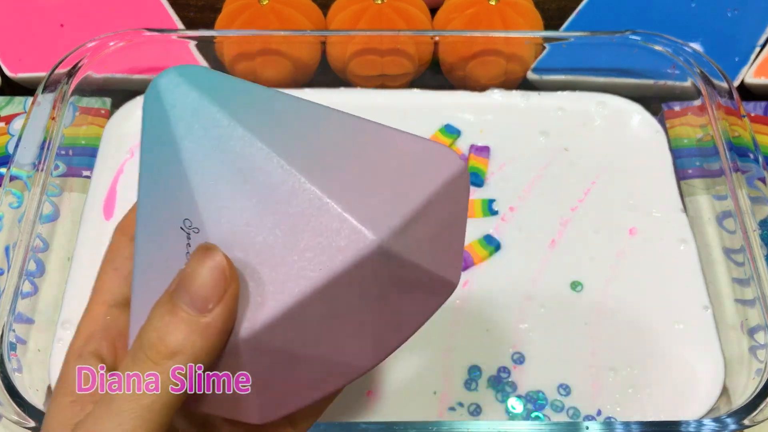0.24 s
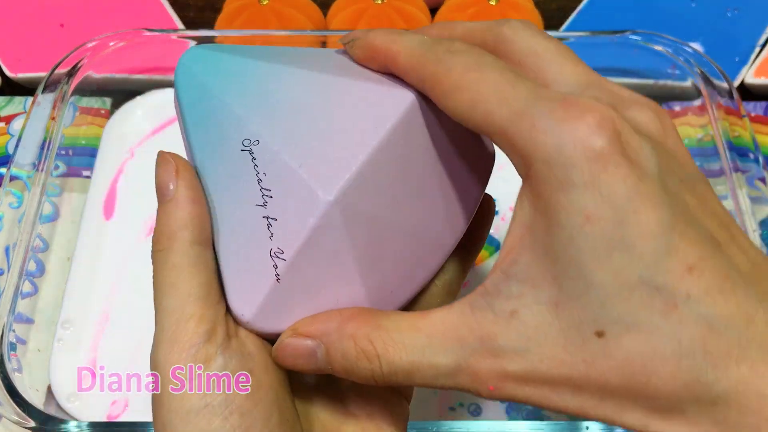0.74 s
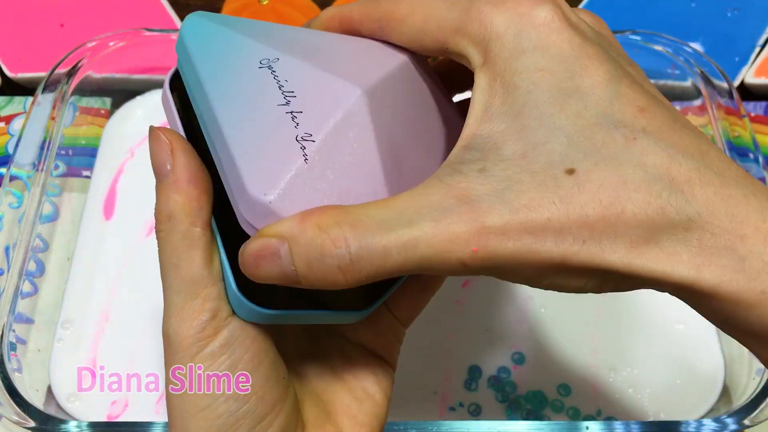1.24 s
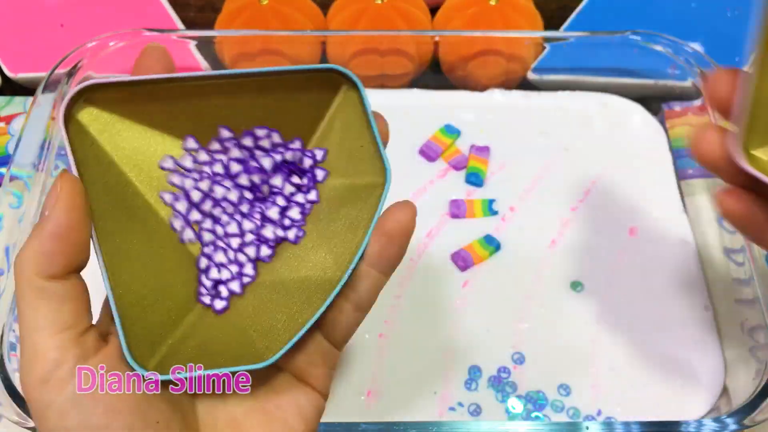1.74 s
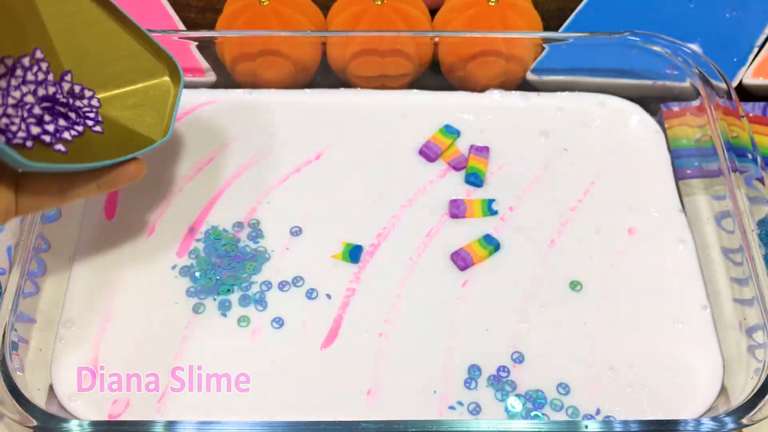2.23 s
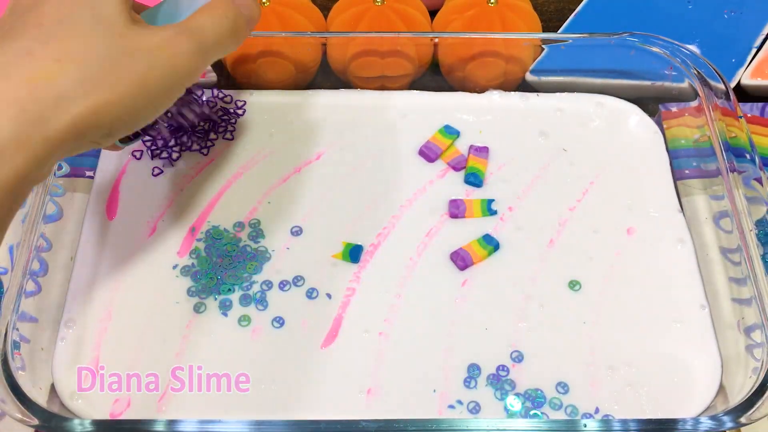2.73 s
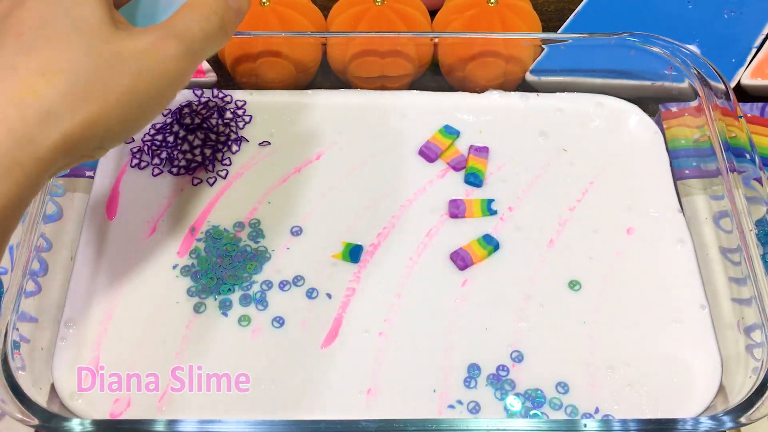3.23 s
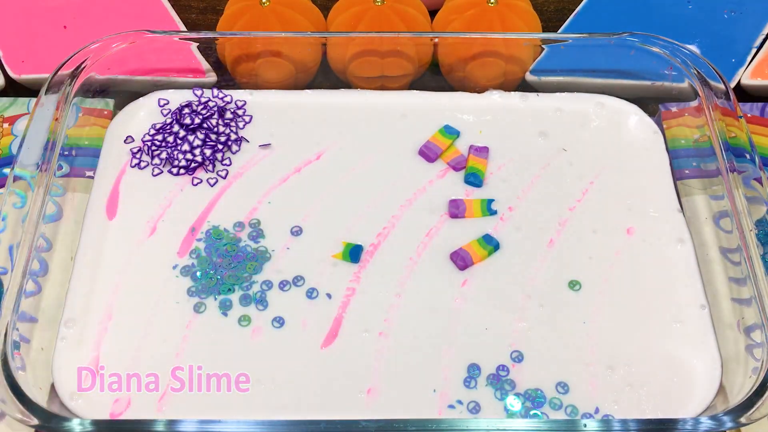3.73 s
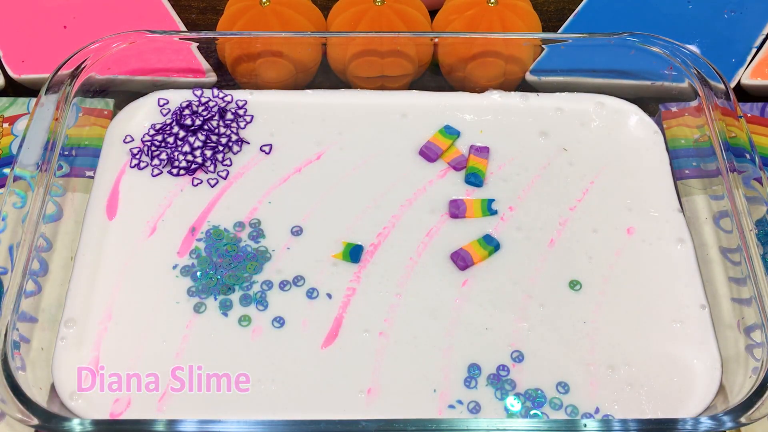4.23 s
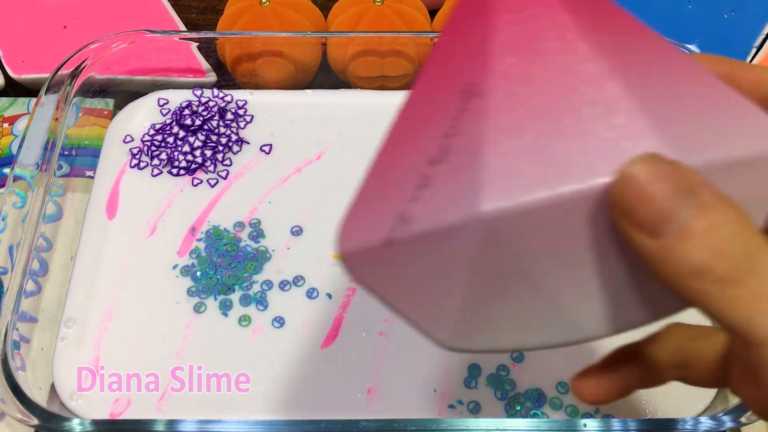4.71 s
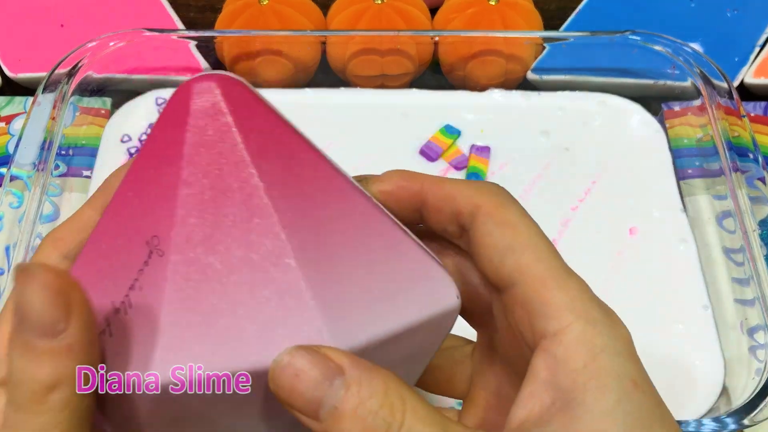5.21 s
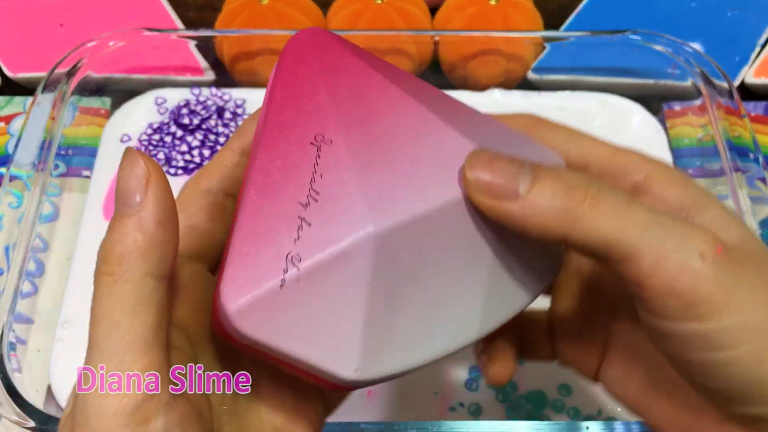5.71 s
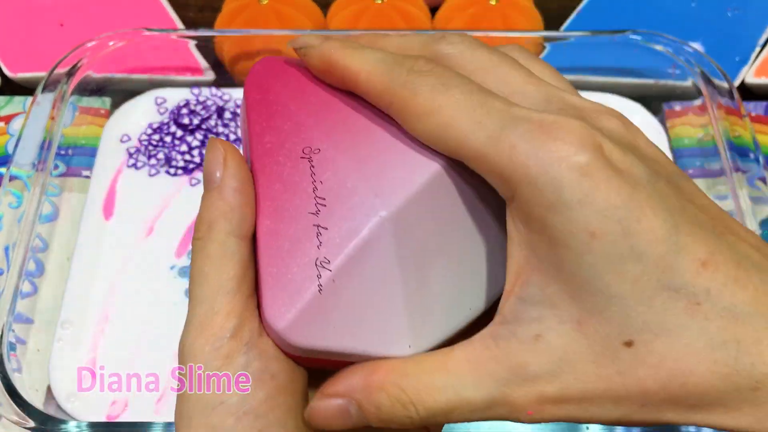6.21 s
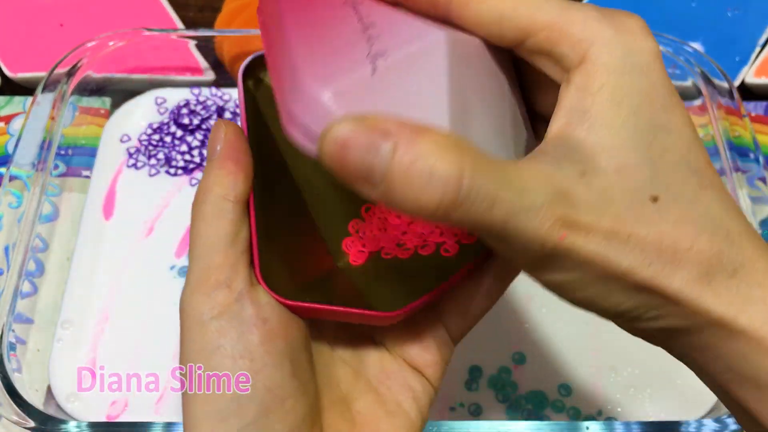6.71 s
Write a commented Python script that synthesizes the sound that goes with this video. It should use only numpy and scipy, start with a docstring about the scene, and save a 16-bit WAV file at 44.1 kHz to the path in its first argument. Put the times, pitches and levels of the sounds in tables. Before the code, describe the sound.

Close, dry handling in a small room over faint hiss and a low hum that swells in the first seconds, then sinks. Around 0.5 s sequins rustle softly in a shut tin; fingers brush it, with small knocks at 0.65 and 0.75 and a firmer one at 1.1. The rim scrapes at 1.3, then two loud hollow clacks at 1.42 and 1.55 free the lid. From 1.85 to 2.05 the sequins shake in bright metallic swishes. They pour at 2.4 to 2.5, trickle, then stream again from 2.8, thinning into sharp little tick clusters until 3.5. The empty tin slides with a faint singing scrape at 3.8 to 4.0; a sleeve swishes at 4.25, then a soft bump. A second tin rustles from 4.75 to 5.9, with light scrapes and finger rubbing from 5.7 to 6.6. At 6.67 its tight lid pops sharply with a low thump and brief ring, followed by small rim scrapes to 6.95.

```python
"""Sequin tins opened by hand

Close by, hands work the lid off a small faceted tin, shake the plastic sequins inside and tip them onto slime.
The last sequins tick out in clusters; the tin slides aside, a second is turned and its tight lid pops off.
Knocks and the pop are fading tones with bursts of noise; rubbing and sequins are showers of tiny random
contacts that ring the tin walls. A small dry room with a low hum lies behind.
"""
import sys
import numpy as np
from scipy import signal
from scipy.fft import rfft, irfft, next_fast_len
from scipy.io import wavfile

SR = 44100
rng = np.random.default_rng(int(sys.argv[2]) if len(sys.argv) > 2 else 0)


def transcribe(signal):
    """Save signal, clipped to [-1, 1], as a 16-bit WAV file at the path in sys.argv[1]."""
    frames = np.atleast_2d(signal).T
    limited = np.clip(frames, -1, 1)
    pcm = np.round(limited * 32767).astype(np.int16)
    wavfile.write(sys.argv[1], SR, pcm)


N = 306495

TIME = np.arange(N) / SR  # the whole scene, in seconds
AGE = TIME[:SR // 2]  # seconds since a blow


def amp(db):
    """Turn decibels into a gain."""
    return 10 ** (np.asarray(db) / 20)


def unit(x):
    """Scale a sound to rms 1."""
    return x / np.sqrt(np.mean(x ** 2) + 1e-20)


def crest(x):
    """Scale a sound so that its few tallest samples stand near 1."""
    tallest = np.sort(np.abs(x))[-4:]
    return x / np.mean(tallest)


def along(points, hz):
    """Read a curve of (pitch, value) points at any pitch, on a log pitch axis."""
    point_hz, value = np.transpose(points)
    return np.interp(np.log(hz + 1), np.log(point_hz), value)


def add(track, s, sound):
    """Mix a sound into the track at time s."""
    part = track[round(s * SR):][:len(sound)]
    part += sound[:len(part)]


def noise(length):
    """Plain white noise."""
    return rng.standard_normal(length)


def fade(t60):
    """Exponential decay after a blow: it falls by 60 dB in t60 seconds."""
    return np.exp(-np.log(1000) * AGE / t60)


def swell(s, db, spread):
    """Bell-shaped gain of one stroke, at its top at time s; spread is the bell's standard deviation in s."""
    gain = np.zeros(N)
    near = slice(max(0, int((s - 5 * spread) * SR)), int((s + 5 * spread) * SR))
    gain[near] = amp(db) * np.exp(-((TIME[near] - s) / spread) ** 2 / 2)
    return gain


def swells(rows):
    """Joint gain of several bell-shaped strokes; their powers add."""
    return np.sqrt(sum(swell(*row) ** 2 for row in rows))


def stroke(s, length, db, growth, rise, fall):
    """Gain of one movement: it sets in, grows or sags for its length, then dies; slopes in dB per second."""
    t = TIME - s
    level_db = db + growth * np.clip(t, 0, length)
    before_db = abs(rise) * np.maximum(-t, 0)
    after_db = abs(fall) * np.maximum(t - length, 0)
    return amp(level_db - before_db - after_db)


def filtered(x, response):
    """Shape a sound by a gain that depends on pitch."""
    m = next_fast_len(len(x) + 8192)
    return irfft(rfft(x, m) * response(np.fft.rfftfreq(m, 1 / SR)), m)[:len(x)]


def coloured(x, spectrum):
    """Give a sound a tone colour, at rms 1."""
    return unit(filtered(x, lambda hz: amp(along(spectrum, hz))))


def grains(rate, spread_db):
    """Tiny random contacts of uneven size, on average rate a second."""
    hits = rng.random(N) < rate / SR
    return hits * noise(N) * amp(spread_db * noise(N))


def patter(rate, spread_db, t60, count=8):
    """Contacts of pieces of many sizes: each clicks and rings briefly in its own part of the spectrum."""
    clicks = grains(rate, spread_db) / np.sqrt(rate)
    family = rng.integers(count, size=N)
    pole = np.exp(-np.log(1000) / (t60 * SR))  # loss per sample
    rings = np.zeros(N)
    for k, hz in enumerate(np.linspace(2000, 15000, count)):
        resonance = [1, -2 * pole * np.cos(2 * np.pi * hz / SR), pole ** 2]
        rings += signal.lfilter([1, 0, -1], resonance, clicks * (family == k))
    return unit(unit(rings) + 1.822 * unit(clicks))


def through_tin(x, spectrum, peaks, t60, ring_db):
    """Contacts ring the thin walls: a few strong resonances over a dense crowd of weak ones. Rms 1."""
    age = AGE[:SR // 10]
    tail = noise(len(age)) * fade(t60)[:len(age)]
    rung = x + amp(ring_db) * signal.oaconvolve(x, tail / np.linalg.norm(tail))[:N]
    grid = np.linspace(0, SR / 2, 4096)
    power = 1 + sum(amp(db) ** 2 / (1 + (2 * (grid - hz) / width) ** 2) for hz, width, db in peaks)
    gain = np.sqrt(power) * amp(along(spectrum, grid))
    return unit(filtered(rung, lambda hz: np.interp(hz, grid, gain)))


def ring(modes, scatter_db):
    """Fading tones of struck metal, each with a new random strength and sign."""
    out = np.zeros(len(AGE))
    for hz, db, t60 in modes:
        strength = amp(db + scatter_db * rng.standard_normal()) * rng.choice([-1, 1])
        out += strength * fade(t60) * np.sin(2 * np.pi * hz * AGE)
    return out


# How the low hum and rumble swell and sink: start_s, level_db (before the shares set below)
RUMBLE_LEVEL = [(0.2, -74), (0.37, -54.5), (1.75, -51), (3.6, -60), (5.2, -70), (6.6, -62)]
# Tone colour of the rumble: pitch_hz, relative level_db per Hz
RUMBLE_COLOUR = [(25, -40.5), (45, -10), (60, 4), (80, -3), (110, -13.5), (130, -3), (160, -29), (250, -18),
                 (600, -42.5), (2000, -85)]
# Tone colour of the even hiss: pitch_hz, relative level_db per Hz
HISS_COLOUR = [(35, -29), (60, -9.5), (103, -15.5), (133, -11.5), (212, -20.5), (262, -20), (338, -20),
               (946, -30.5), (1510, -28), (1700, -30.5), (2710, -31), (3190, -33), (16000, -39)]


def background():
    """A low hum in rumble that swells and sinks, and even hiss."""
    hum_hz = 59.3
    hum = np.sqrt(2) * np.sin(2 * np.pi * hum_hz * TIME + 2 * np.pi * rng.random())
    low = amp(-8.5) * hum + amp(-4.5) * coloured(noise(N), RUMBLE_COLOUR)
    level = amp(np.interp(TIME, *np.transpose(RUMBLE_LEVEL)))
    return level * low + amp(-62.5) * coloured(noise(N), HISS_COLOUR)


# How long the room rings on: pitch_hz, t60_s (time to fall by 60 dB)
ROOM_DECAY = [(200, 0.25), (1500, 0.16), (4000, 0.25), (12000, 0.12)]


def room(x):
    """A short diffuse answer that builds up over a few milliseconds, its decay set by pitch."""
    hz, t, z = signal.stft(noise(len(AGE)), SR, nperseg=256)
    decay = amp(-60 * t / along(ROOM_DECAY, hz)[:, None])
    tail = signal.istft(z * decay, SR, nperseg=256)[1][:len(AGE)]
    tail *= 1 - np.exp(-AGE / 0.0094)
    return signal.fftconvolve(x, tail / np.linalg.norm(tail))[:N]


POP_AT = 6.6675  # the tight lid lets go (s)
ECHO_DELAY_S, ECHO_DB, ECHO_T60_S = 0.028, -37, 0.25
# Tone colour of the returning thump: pitch_hz, relative level_db per Hz
ECHO_COLOUR = [(100, -26), (200, -5), (270, 5), (380, 1), (480, -18), (900, -48), (3000, -78)]


def thump_echo():
    """The pop's low thump comes back from the room as a short boom of fading noise."""
    boom = coloured(noise(len(AGE)), ECHO_COLOUR) * fade(ECHO_T60_S) * (1 - np.exp(-AGE / 0.0023))
    out = np.zeros(N)
    add(out, POP_AT + ECHO_DELAY_S, amp(ECHO_DB) * boom)
    return out


# An arm swishes past: middle_s, rms level_db at its top, spread_s
ARM_REACH = [(4.24, -61.5, 0.095)]
# Tone colour of the sleeve: pitch_hz, relative level_db per Hz
SLEEVE_COLOUR = [(120, -40.5), (200, -13.5), (312, -11), (719, -22), (800, -12), (3090, -15.5),
                 (14000, -29.5)]


def sleeve():
    """A sleeve swishes: soft noise that swells and sinks."""
    return coloured(noise(N), SLEEVE_COLOUR) * swell(*ARM_REACH[0])


SLIDE_AT, SLIDE_LENGTH_S = 3.76, 0.23
# starting level, growth as it gathers speed, and the slope at either end
SLIDE_DB, SLIDE_GROWTH_DB_PER_S, SLIDE_EDGE_DB_PER_S = -63, 58, 233.5
# Tone colour of tin on table: pitch_hz, relative level_db per Hz
TABLE_COLOUR = [(500, -31), (1300, -31), (1750, -3), (2500, -10), (3600, -0.5), (5000, -1), (7200, -1.5),
                (10000, -5.5), (12500, -4), (16000, -12.5)]
# The empty tin's resonances: pitch_hz, width_hz, level_db over the tone colour
EMPTY_TIN = [(2350, 50, 18), (2860, 70, 10), (3950, 79, 10), (4646, 62, 9.5), (4770, 72, 10.5),
             (6000, 64, -5), (7160, 190, 5.5), (8900, 150, 6)]


def slide():
    """The empty tin sings faintly as its many contacts with the table ring its walls."""
    edge = SLIDE_EDGE_DB_PER_S
    speed = stroke(SLIDE_AT, SLIDE_LENGTH_S, SLIDE_DB, SLIDE_GROWTH_DB_PER_S, edge, edge)
    return speed * through_tin(grains(rate=7000, spread_db=2), TABLE_COLOUR, EMPTY_TIN, t60=.05, ring_db=-2)


# The hollow tone of the tin in hand, which climbs as the first lid lifts: start_s, pitch_hz
HOLLOW_TONE = [(1.25, 755), (1.31, 920), (1.37, 1400), (1.55, 1500), (6.07, 1560), (6.79, 1320)]


def hollow_hz(s):
    """Pitch of the hollow tone of the tin in hand at time s."""
    return np.interp(s, *np.transpose(HOLLOW_TONE))


# The rim scrapes on the tin while the fingers slip on it (the hands play the hiss):
# middle_s, rms level_db at its top, spread_s, finger hiss rms level_db
RIM_SCRAPES = [(0.653, -50, 0.0038, -69), (1.326, -39.5, 0.01, -47.5), (1.364, -37.5, 0.0084, -41.5),
               (1.491, -62, 0.0081, -55), (1.554, -36, 0.0072, -48), (1.632, -42.5, 0.01, -48),
               (5.686, -50, 0.011, -68), (5.992, -41.5, 0.0062, -54), (6.845, -36.5, 0.0056, -45),
               (6.945, -50, 0.006, -56)]
# Each lid drags lightly as it comes clear: middle_s, rms level_db at its top, spread_s
LID_DRAGS = [(1.39, -46.5, 0.035), (6.842, -47.5, 0.065)]
# Tone colour of the rim: pitch_hz, relative level_db per Hz
RIM_COLOUR = [(200, -10), (700, -9), (1500, -7), (2400, -8), (3500, -8), (4500, -17.5), (5400, -9.5),
              (7000, -15), (15000, -27)]


def scrapes():
    """The rim sticks and slips in a shower of contacts that excites the tin's hollow tone."""
    peaks = [(3520, 140, 2.3), (5700, 250, 5.13)]  # pitch_hz, width_hz, level_db
    rub = through_tin(grains(rate=6000, spread_db=0), RIM_COLOUR, peaks, t60=0.036, ring_db=-12.5)
    out = np.zeros(N)
    for s, db, spread, *_ in RIM_SCRAPES + LID_DRAGS:
        hollow = signal.lfilter(*signal.iirpeak(hollow_hz(s), 5, fs=SR), rub)
        out += swell(s, db, spread) * unit(hollow + amp(-19.0) * rub)
    return out


# Fingers brush the lacquer: middle_s, rms level_db at its top, spread_s
FINGER_BRUSHES = [(0.674, -48.5, 0.014), (0.944, -53.5, 0.02), (1.034, -51, 0.0095), (5.853, -51.5, 0.0046),
                  (5.947, -56, 0.0063), (6.303, -54, 0.011), (6.347, -51.5, 0.0043), (6.395, -53.5, 0.018),
                  (6.524, -51, 0.0142), (6.606, -58.5, 0.015)]
# Tone colour of skin on lacquer: pitch_hz, relative level_db per Hz
SKIN_COLOUR = [(400, -19.5), (800, -9), (1500, -4.5), (3000, -1.5), (5000, -2.5), (6400, -7), (8200, -4),
               (12200, -4), (16000, -11)]
# the fingers step round the second lid in even, weakening steps
WALK_AT, WALK_STEP_S, WALK_SPREAD_S = 6.06, 0.066, 0.0165
WALK_DB, WALK_LOSS_DB = -50.5, 1.3  # first step, and the loss with each further one


def hands(count=3):
    """Fingers brush the lacquer, slip with every scrape and walk round the lid, each with its own ring."""
    slips = [(s, hiss_db, spread) for s, _, spread, hiss_db in RIM_SCRAPES]
    walk = [(WALK_AT + k * WALK_STEP_S, WALK_DB - k * WALK_LOSS_DB, WALK_SPREAD_S) for k in range(4)]
    strokes = FINGER_BRUSHES + slips + walk
    peaks = [(5506, 260, -2), (8750, 308, 1)]  # pitch_hz, width_hz, level_db
    out = np.zeros(N)
    for finger in range(count):
        contacts = grains(rate=12000, spread_db=0.0)
        skin = through_tin(contacts, SKIN_COLOUR, peaks, t60=0.018, ring_db=-0.5)
        out += skin * swells(strokes[finger::count])  # the fingers take turns
    return out


HOLLOW_CYCLES = 19  # the hollow tone falls by 60 dB in this many cycles
WALL_DB = -23.5  # ring of the walls under the hollow tone
# The tin's walls, damped by the hand: pitch_hz, relative level_db, t60_s
WALL_TONES = [(1139, -7, .02), (1730, 13.5, 0.015), (1881, 4, 0.044), (2456, -3.5, .04), (2825, -1.5, .035),
              (3110, -8, .035), (3330, -5, 0.03), (3830, -4, .03), (4700, -8.5, 0.027), (5094, -10, 0.046),
              (6980, -8.5, 0.029), (8380, -9, .025), (10700, -12, 0.022)]


def blow(tone_hz, crack_db, bright_hz):
    """One blow sounds a fading hollow tone, the ring of the walls and a crack of noise. Peak near 1."""
    hollow = np.sin(2 * np.pi * tone_hz * AGE) * fade(HOLLOW_CYCLES / tone_hz)
    hollow *= 1 - np.exp(-AGE / .0012)
    walls = amp(WALL_DB) * ring(WALL_TONES, scatter_db=3)
    crack = amp(crack_db) * noise(len(AGE)) * fade(0.017)
    # a softer contact leaves out the treble
    soften = signal.butter(3, min(bright_hz, .45 * SR), fs=SR)
    # a small tin radiates little below its hollow tone
    thin = signal.butter(2, 0.55 * tone_hz, "high", fs=SR)
    return crest(signal.lfilter(*thin, hollow + signal.lfilter(*soften, walls + crack)))


# The lid knocks on the tin: start_s, peak level_db, crack level_db (before softening and scaling),
# brightness_hz of the contact
LID_KNOCKS = [(0.641, -38.5, 5, 1730), (0.739, -30.5, 17, 1540), (1.027, -45, -4, 6000),
              (1.101, -17, 7, 3200), (1.29, -46.5, -5.5, 2000), (1.319, -30, 18, 4000),
              (1.4206, -6.5, -14, 4450), (1.551, -5.5, -14, 12300), (2.4408, -32.5, 22.5, 5030),
              (5.982, -40, 2, 2560), (6.789, -33.5, -8, 2590)]
# Soft bumps as the second tin is picked up and gripped: start_s, peak level_db, pitch_hz
HAND_THUDS = [(4.397, -43, 304), (6.300, -42, 610)]
THUD_CRACK_DB, THUD_BRIGHT_HZ = 14.5, 1030


def knocks():
    """Hard knocks of the lid at the tin's hollow tone, and soft low bumps of the hand."""
    out = np.zeros(N)
    for s, db, crack_db, bright_hz in LID_KNOCKS:
        add(out, s, amp(db) * blow(hollow_hz(s), crack_db, bright_hz))
    for s, db, hz in HAND_THUDS:
        add(out, s, amp(db) * blow(hz, THUD_CRACK_DB, THUD_BRIGHT_HZ))
    return out


# The freed lid rings: pitch_hz, relative level_db, t60_s
LID_TONES = [(277, -1.5, 0.204), (710, -11, 0.15), (1210, -13, 0.18), (1438, -16, .07), (1970, 7, 0.1),
             (2620, 6, 0.046), (2730, -17, .12), (3140, -5, 0.13), (3220, -5, 0.18), (3660, -21, 0.2),
             (3830, -2.5, 0.12), (4150, -10, .12), (4830, -21, 0.16), (5200, 1, 0.11), (5560, -18, 0.19),
             (6308, -17, .15), (6990, -55, .2), (7500, -12, .16), (8730, 1.5, 0.2), (10700, -4, 0.092),
             (12400, -6.5, 0.1)]
# Tone colour of the snap: pitch_hz, relative level_db per Hz
CRACK_COLOUR = [(60, -32), (140, -9), (310, 1.5), (500, -12.5), (950, -18.5), (1480, -8.5), (1800, -12),
                (2600, -9.5), (3120, 2.5), (3750, -9.5), (4380, -15.5), (5050, -6), (6000, -15),
                (7200, -13.5), (8200, -21), (10200, -12.5), (11400, -16.5), (12700, -11), (13600, -23.5),
                (16000, -25)]


def pop():
    """The rim creeps, snaps over its bead, air thumps into the tin and the free lid rings on."""
    # pitch_hz, relative level_db per Hz
    creep_colour = [(100, -8), (400, -2.5), (900, -21), (3500, -4), (8000, -33.5)]
    out = swell(POP_AT - .001, -27, 0.0032) * coloured(noise(N), creep_colour)
    snap = amp(-7.0) * np.exp(-(AGE / 0.0038) ** 2)
    snap_tail = amp(-21.5) * fade(0.051) + amp(-32.0) * fade(0.2)
    add(out, POP_AT, coloured(noise(len(AGE)), CRACK_COLOUR) * (snap + snap_tail))
    add(out, POP_AT, amp(-36.0) * ring(LID_TONES, scatter_db=3.0))
    # the air's resonance climbs as the gap opens
    air_hz = 330 - 190 * np.exp(-AGE / 0.0031)
    thump = -np.sin(2 * np.pi * np.cumsum(air_hz) / SR) * fade(0.019) * (1 - np.exp(-AGE / 0.0024))
    thump = signal.lfilter(*signal.butter(2, 130, "high", fs=SR), thump)  # too small a tin to push deep bass
    add(out, POP_AT - .001, amp(-7.0) * thump)
    return out


# Faint little clusters of sequin ticks fall at loosely random times in this stretch: start_s, end_s
STRAY_STRETCH = (2.82, 3.4)
STRAY_DB, STRAY_SPREAD_DB, STRAY_LENGTH_S = -38, 1.5, 0.005


def strays(count):
    """Faint little clusters at loosely random times: rows like those of the other clusters."""
    times = np.interp(np.arange(count) + rng.random(count), [0, count], STRAY_STRETCH)
    return [(s, STRAY_DB + STRAY_SPREAD_DB * rng.standard_normal(), STRAY_LENGTH_S) for s in times]


# Sequins strike the tin in little clusters: start_s, peak level_db, length_s
TICK_CLUSTERS = [(2.508, -22, 0.0082), (2.525, -29.5, 0.0086), (2.589, -37, 0.0023), (2.65, -42.5, .004),
                 (2.788, -31, .003), (2.796, -23.5, 0.0027), (2.8995, -30.5, 0.0034), (2.926, -33, 0.0078),
                 (3.082, -29.5, 0.009), (3.112, -26.5, 0.0091), (3.187, -30.5, .008), (3.266, -37.5, .012),
                 (3.361, -38.5, 0.016), (3.463, -36.5, 0.0036)]
# Tone colour of a tick: pitch_hz, relative level_db per Hz
TICK_COLOUR = [(900, -32), (1800, -10), (2600, 1.5), (3600, -8), (6000, -6), (9000, -7), (11500, -2),
               (12900, 6.5), (13800, -8), (16000, -6)]


def ticks():
    """A clump lands as a few sharp contacts in quick succession and sets the tin buzzing briefly."""
    out = np.zeros(N)
    order = np.arange(4)
    for s, db, length in TICK_CLUSTERS + strays(count=5):
        delays = length * (order + rng.random(4) * (order > 0)) / 4  # the first lands at once
        burst = np.zeros(len(AGE))
        for delay in delays:
            contact = np.exp(-np.abs(AGE - delay) / .0012) * (AGE >= delay)
            burst += contact * amp(1.5 * rng.standard_normal())
        # every clump hits a new spot
        colour = [(hz, gain_db + 1.1 * rng.standard_normal()) for hz, gain_db in TICK_COLOUR]
        buzz = 0.35 * fade(0.078)
        add(out, s, amp(db) * crest(coloured(noise(len(AGE)), colour) * (burst + buzz)))
    return out


# A shut tin rustles as it is turned: middle_s, rms level_db at its top, spread_s
TIN_TURNS = [(0.46, -57, 0.058), (4.75, -56, 0.066), (5.32, -53.5, 0.036), (5.51, -56, 0.12),
             (5.9, -60, 0.21)]
# Tone colour of sequins in a shut tin: pitch_hz, relative level_db per Hz
SHUT_COLOUR = [(400, -34), (1100, -10.5), (1500, -6), (3200, -1.5), (3650, -11), (4600, -1), (6300, -8.5),
               (8600, -8), (10200, -13), (11400, -6.5), (13000, -17), (16000, -11)]
# The shut tin's resonances: pitch_hz, width_hz, level_db over the tone colour
CLOSED_TIN = [(1520, 160, 9), (2025, 43, 11), (2510, 59, 9), (2550, 50, 0.5), (5100, 210, -5),
              (8616, 90, 5), (9050, 150, 6)]


def turned_sequins():
    """Sequins shift inside a shut tin: light contacts ring its walls."""
    contacts = patter(rate=4000, spread_db=2, t60=.0018)
    return swells(TIN_TURNS) * through_tin(contacts, SHUT_COLOUR, CLOSED_TIN, t60=.04, ring_db=-1)


# The heap slides across the open tin: middle_s, rms level_db at its top, spread_s
HEAP_SHAKES = [(1.851, -38.5, 0.016), (1.923, -38, 0.031), (1.997, -35.5, 0.015), (2.06, -45, 0.016),
               (2.22, -60.5, 0.011)]
# Tone colour of the heap: pitch_hz, relative level_db per Hz
HEAP_COLOUR = [(600, -16.5), (1000, -13), (1600, -9), (2200, -2.5), (3100, -7.5), (4600, 0), (6600, -3),
               (8700, -0.5), (10000, -7.5), (11400, -2), (13300, -8.5), (16000, -7)]
# The open tin rings under the sequins, shaken or poured: pitch_hz, width_hz, level_db over the tone colour
OPEN_TIN = [(2404, 68, 8), (2815, 180, 11.5), (3280, 190, 0.5), (4000, 54, 6), (4860, 180, 5),
            (5380, 74, 4.5), (11200, 140, 5.5), (11350, 100, 3)]


def shaken_sequins():
    """The sliding heap is a dense patter of light contacts that rings the open tin."""
    contacts = patter(rate=10000, spread_db=2, t60=.002)
    return swells(HEAP_SHAKES) * through_tin(contacts, HEAP_COLOUR, OPEN_TIN, t60=.04, ring_db=-1)


# The tin is tipped twice and sequins stream over the rim, with a trickle between:
# start_s, length_s, starting rms level_db, growth in dB per second
SEQUIN_POURS = [(2.411, 0.095, -46, 100.5), (2.601, 0.2, -60, -11.5), (2.81, 0.4, -49, -26.5)]
POUR_RISE_DB_PER_S, POUR_FALL_DB_PER_S = 1200, 160.5
# Tone colour of the stream: pitch_hz, relative level_db per Hz
STREAM_COLOUR = [(600, -50.5), (1200, -20), (1600, -8), (2100, -6), (3000, -5), (4200, -5), (7000, -3),
                 (9500, -4.5), (11500, -5.5), (12900, -9), (14000, -9.5), (16000, -1)]


def poured_sequins():
    """Sequins stream over the rim; the contacts grow sparse when the stream thins to a trickle."""
    pours = [stroke(*row, POUR_RISE_DB_PER_S, POUR_FALL_DB_PER_S) for row in SEQUIN_POURS]
    flow = np.sqrt(sum(gain ** 2 for gain in pours))
    rate = 500 + 28000 * (flow / flow.max()) ** 1.6  # contacts per second
    contacts = patter(rate, spread_db=2.7, t60=.002)
    return flow * through_tin(contacts, STREAM_COLOUR, OPEN_TIN, t60=.025, ring_db=-5)


def scene():
    """All the handling, the room's answer to it and the background."""
    handling = slide() + sleeve() + scrapes() + hands() + knocks() + pop() + thump_echo()
    sequins = ticks() + turned_sequins() + shaken_sequins() + poured_sequins()
    near = handling + sequins
    return (near + amp(-17.0) * room(near) + background())[None]


TOP_HZ = 16000  # nothing above this pitch is kept
# Treble dip of the microphone: pitch_hz, level_db
MICROPHONE_CURVE = [(12400, 0.5), (13000, -2), (13500, -1), (14300, -1), (15300, -1.5)]


def record(dry):
    """The microphone dips in the treble and drops the deepest bass; the recorder clips and limits the band."""
    sound = signal.lfilter(*signal.butter(3, 38, "high", fs=SR), dry[0])
    sound = filtered(sound, lambda hz: amp(along(MICROPHONE_CURVE, hz)))
    return filtered(np.clip(sound, -1, 1), lambda hz: hz < TOP_HZ)[None]


dry = scene()
out = record(dry)
transcribe(out)
```